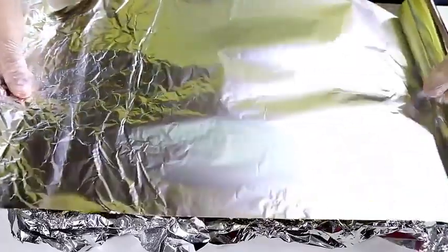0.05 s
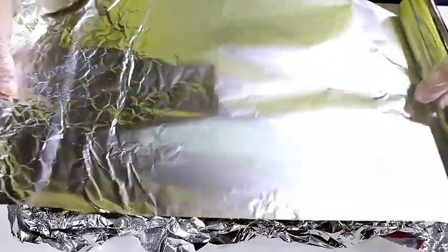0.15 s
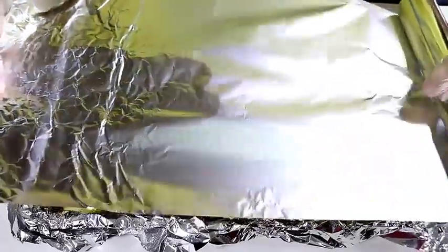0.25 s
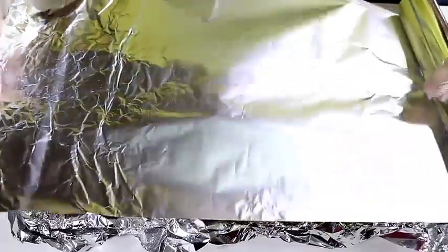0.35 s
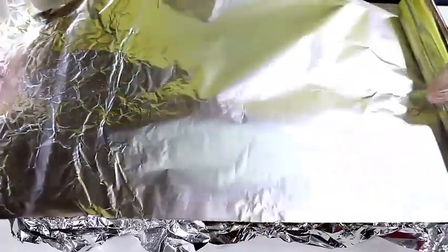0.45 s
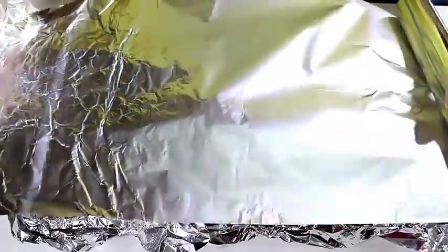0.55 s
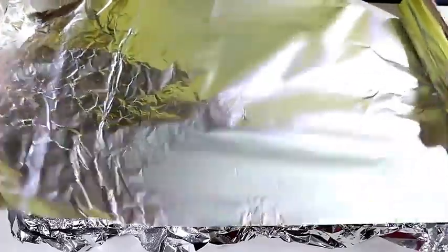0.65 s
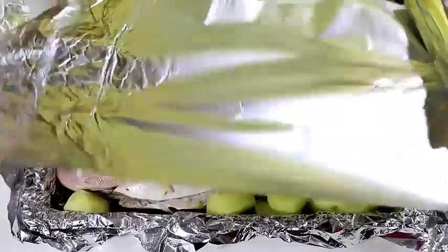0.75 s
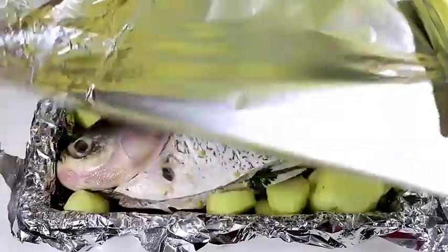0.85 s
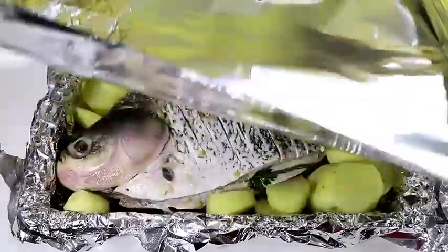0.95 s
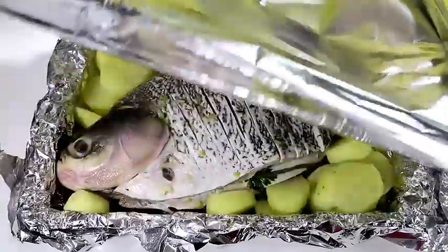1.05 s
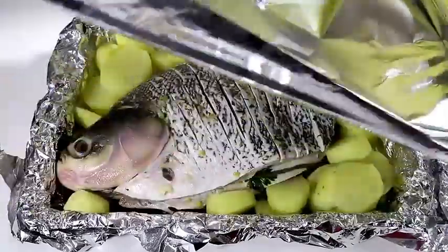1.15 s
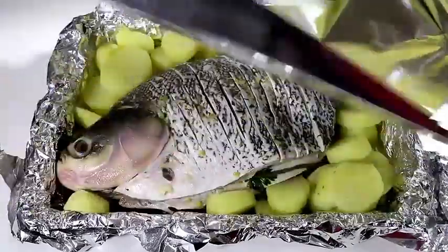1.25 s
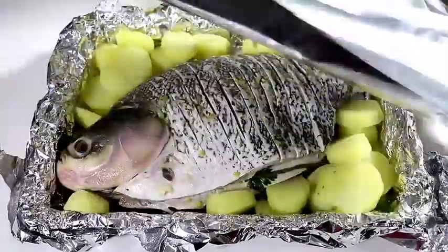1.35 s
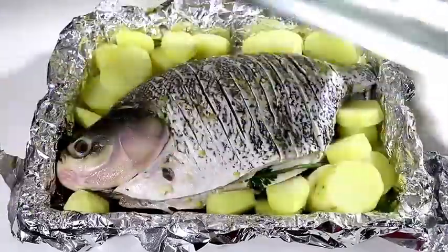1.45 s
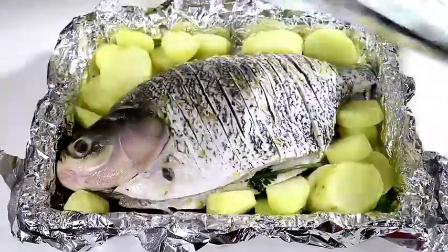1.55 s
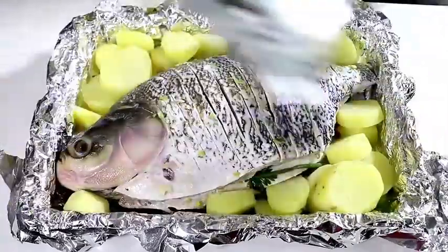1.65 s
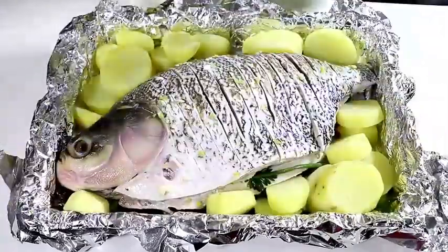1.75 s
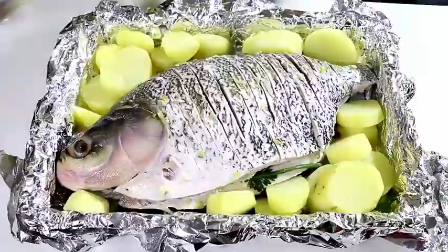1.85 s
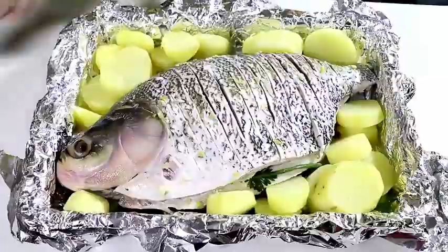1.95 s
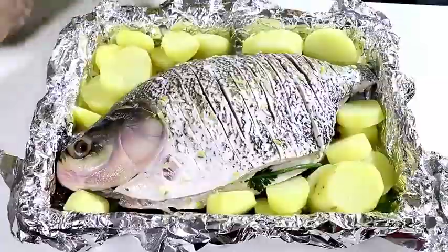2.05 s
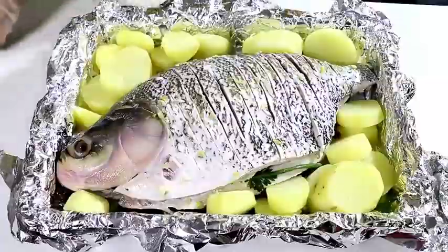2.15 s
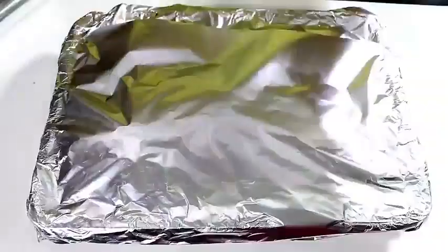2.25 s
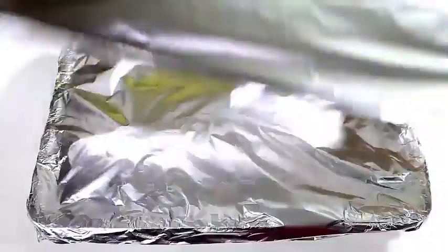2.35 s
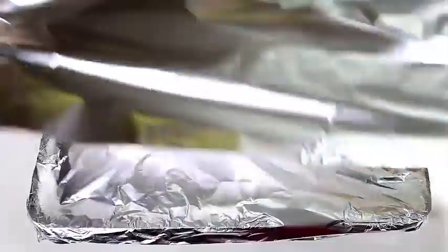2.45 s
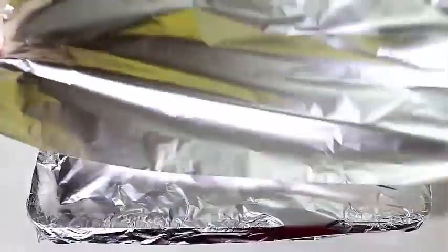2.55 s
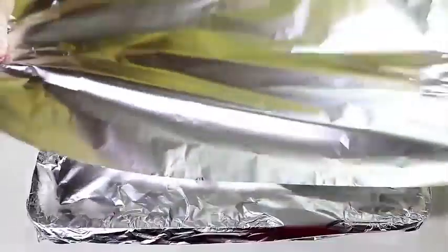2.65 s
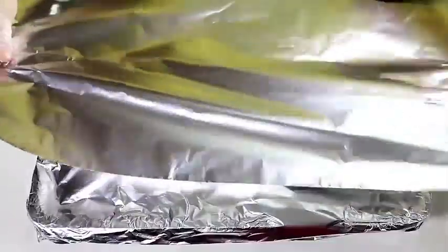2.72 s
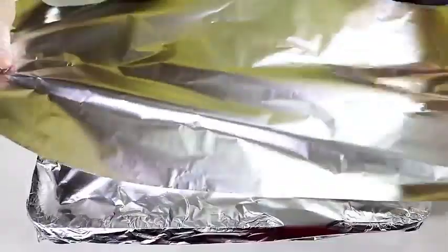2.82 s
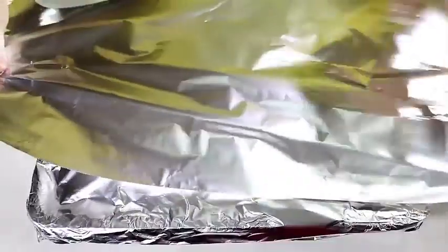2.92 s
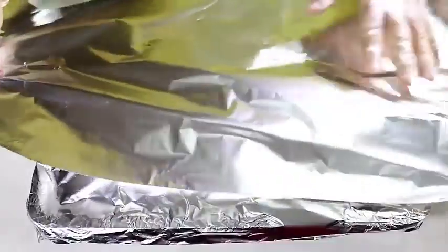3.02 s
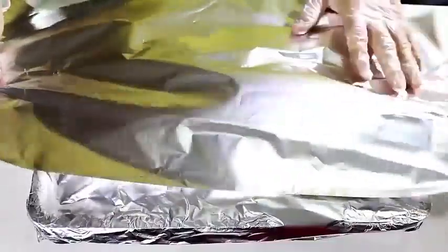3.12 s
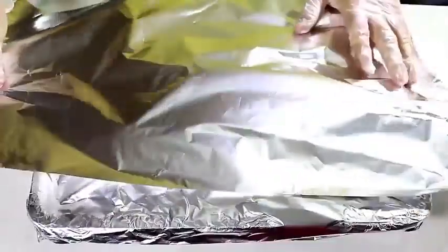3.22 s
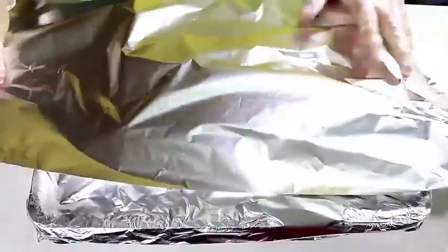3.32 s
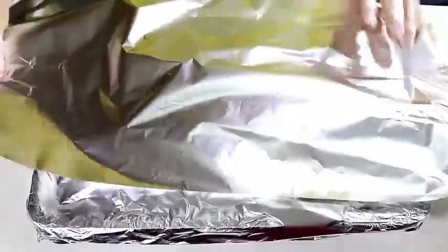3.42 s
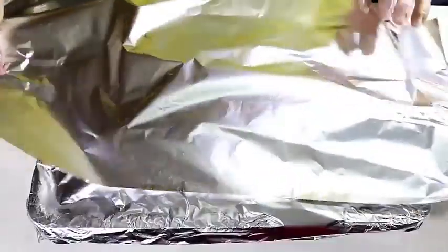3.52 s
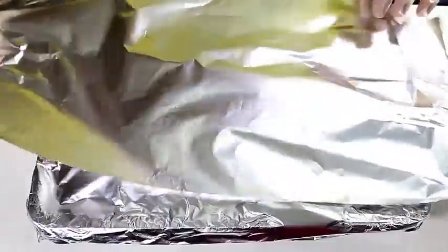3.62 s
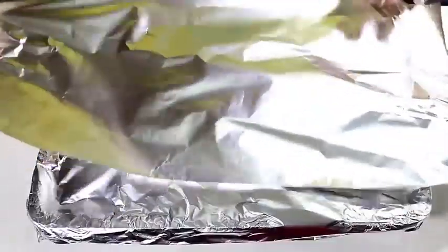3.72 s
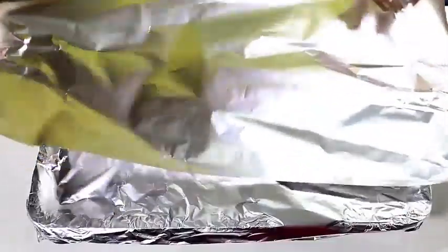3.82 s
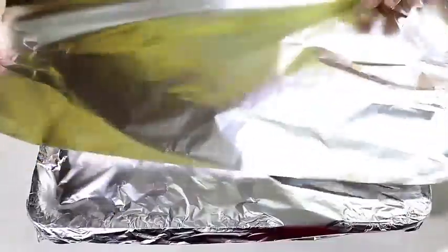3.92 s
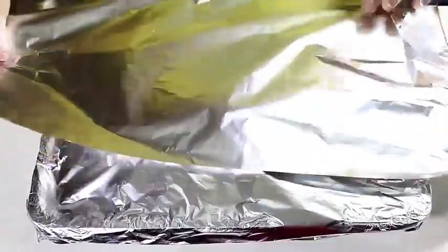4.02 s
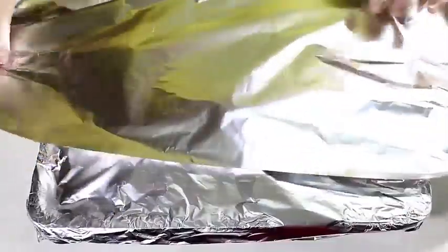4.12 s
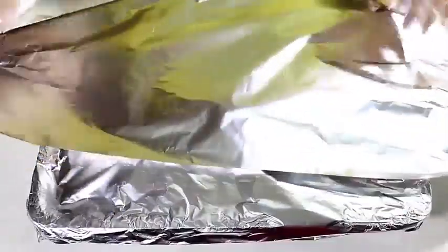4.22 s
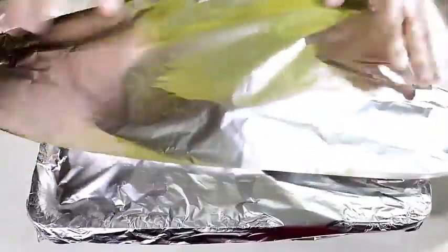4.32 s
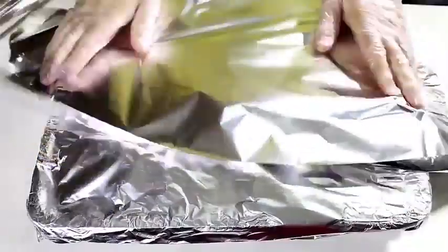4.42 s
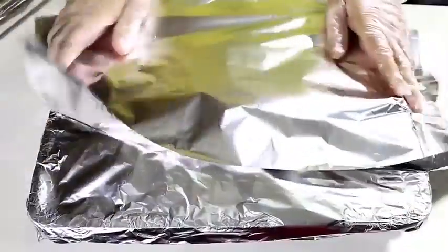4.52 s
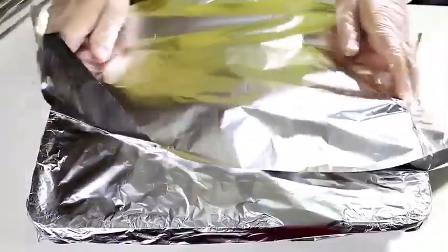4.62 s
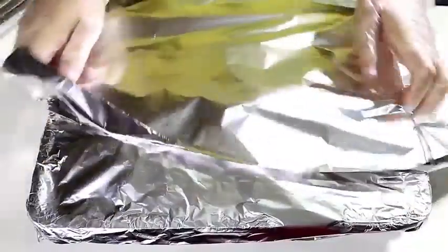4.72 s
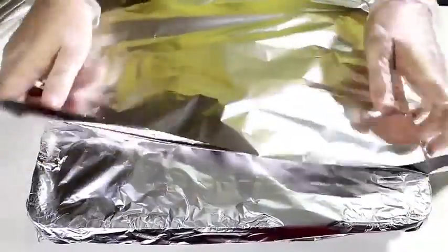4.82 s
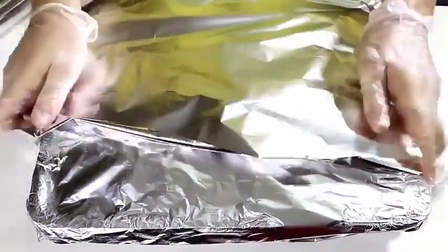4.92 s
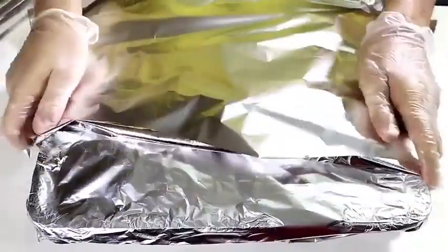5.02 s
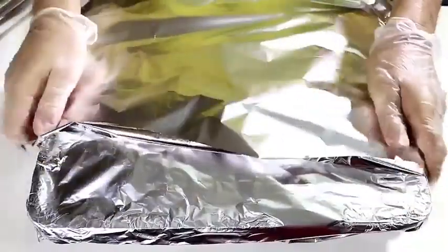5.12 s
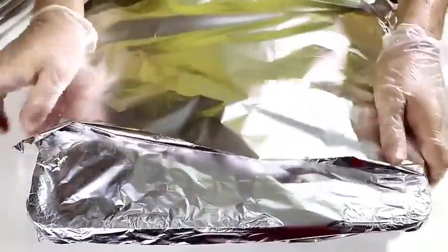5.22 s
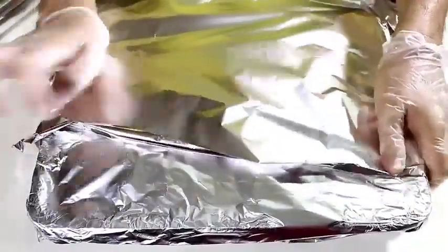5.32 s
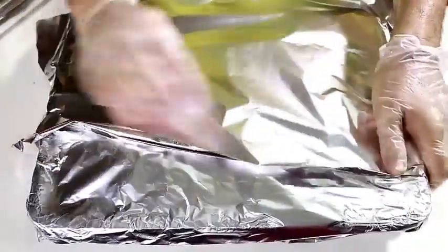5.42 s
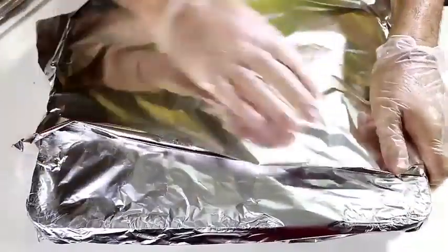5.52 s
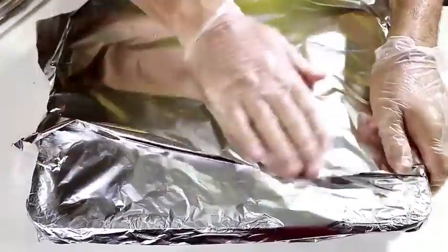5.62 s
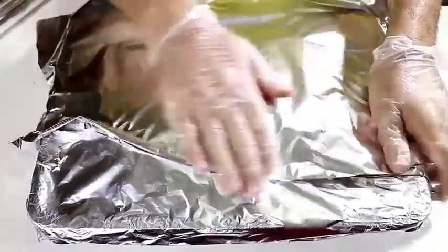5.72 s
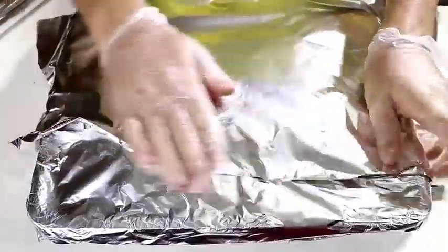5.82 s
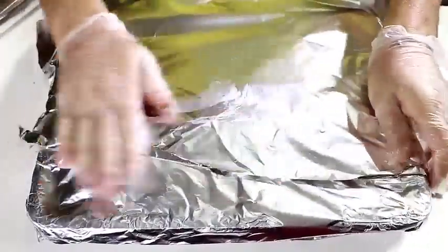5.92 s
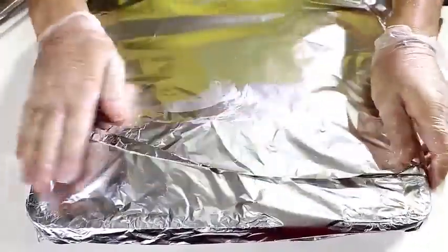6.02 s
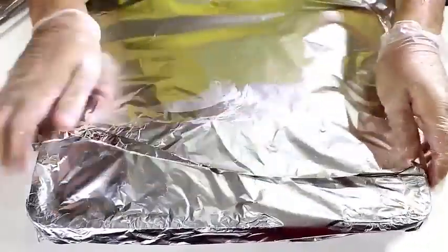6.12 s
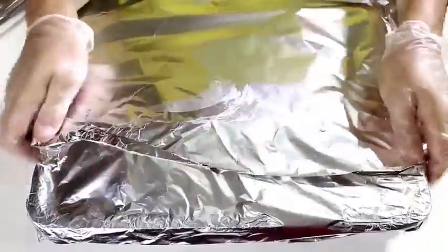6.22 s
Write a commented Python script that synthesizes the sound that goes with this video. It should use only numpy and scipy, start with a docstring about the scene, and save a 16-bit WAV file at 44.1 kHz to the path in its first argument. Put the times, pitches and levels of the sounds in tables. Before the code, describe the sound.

Close to the microphone in a home kitchen, a sheet of aluminium foil rustles quietly, then bursts loudest around one hard snap with a soft push of air. Softer crinkling and fine ticks follow as it is spread; a second burst brings crackles and hollow popping dents as hands press it over a pan. A very faint low murmur lies beneath.

```python
"""A sheet of aluminium foil is pulled, torn off, spread and pressed over a pan, close to one microphone.
It opens on quiet rustles, bursts loudest at 1.5 s around one hard snap, then settles into softer handling;
a second burst comes near 4.6 s, and most of the popping dents follow it, up to the end.
Countless buckles snap through the metal: the smaller the buckle, the higher and shorter its ring.
The sheet and the kitchen smear them into a short shimmer, over a low murmur that never stops."""
import sys
import numpy as np
from scipy import signal
from scipy.fft import rfft, irfft
from scipy.io import wavfile
from scipy.ndimage import uniform_filter1d

SR = 44100
rng = np.random.default_rng(int(sys.argv[2]) if len(sys.argv) > 2 else 0)


def inscribe(sig):
    """Save sig as 16-bit PCM at rate SR to the path in sys.argv[1].

    A 1-D sig is mono; a 2-D sig holds one channel per row.
    Samples are clipped to [-1, 1] before scaling.
    """
    pcm = np.round(np.clip(np.atleast_2d(sig).T, -1, 1) * 32767)
    wavfile.write(sys.argv[1], SR, pcm.astype(np.int16))


N = 276286  # length in samples


def gain_of(db):
    """Turns dB into an amplitude factor; doubled dB give a power factor."""
    return 10 ** (np.asarray(db) / 20)


def evened(x):
    """Scales a sound to an RMS of one."""
    return x / np.sqrt(np.mean(x ** 2) + 1e-20)


def read(points, hz):
    """Reads a curve of (Hz, value) points, with straight lines over log frequency."""
    point_hz, value = np.transpose(points)
    return np.interp(np.log(hz + 1), np.log(point_hz + 1), value)


def coloured(x, points):
    """Equalises a sound along a curve of (Hz, dB) points."""
    gains = gain_of(read(points, np.fft.rfftfreq(len(x), 1 / SR)))
    return irfft(rfft(x) * gains, len(x))


def add(mix, s, sound):
    """Lays a sound into the mix from s seconds on, cut at the end of the mix."""
    part = mix[round(s * SR):][:len(sound)]
    part += sound[:len(part)]


def ring(hz, cycles):
    """One buckle: a sine that swells within about half a cycle and dies after some cycles."""
    turns = np.arange(round(3 * cycles * SR / hz)) * hz / SR
    swell = 1 - np.exp(-2 * turns)
    return np.sin(2 * np.pi * turns) * swell * np.exp(-2 * turns / cycles)


def resonate(x, hz, width_hz):
    """A gliding resonance: shifts the curve hz down to zero, smooths, and shifts back."""
    turn = np.exp(2j * np.pi * np.cumsum(hz) / SR)
    r = np.exp(-np.pi * width_hz / SR)
    return 2 * (turn * signal.lfilter([1 - r], [1, -r], x / turn)).real


# Spectrum of the murmur. Each row: frequency in Hz, gain in dB.
MURMUR = [(18, -38), (30, -13), (102, 6.5), (204, -3), (400, -5), (520, -31), (880, -120)]


def murmur(level_db=-71.5):
    """The low murmur of the kitchen: steady noise, equalised towards the bass."""
    return gain_of(level_db) * evened(coloured(rng.standard_normal(N), MURMUR))


# How long the sheet and walls ring on. Each row: frequency in Hz, time to die by 60 dB in seconds.
RING_ON = [(200, 0.22), (1200, 0.14), (4000, 0.08), (14000, 0.1)]


def shimmer(x, turns_per_s=2.5, count=12):
    """The sheet and nearby walls ring on: noise tails, each band dying at its own speed.
    The sheet keeps moving, so the sound fades from tail to tail around a circle of them."""
    hz, t, z = signal.stft(rng.standard_normal((count, SR // 3)), SR, nperseg=128)
    decay = gain_of(-60 * t / read(RING_ON, hz)[:, None])
    tails = signal.istft(z * decay, SR, nperseg=128)[1]
    place = np.arange(N) / SR * turns_per_s * count
    out = np.zeros(N)
    for k, tail in enumerate(tails):
        distance = abs((place - k + count / 2) % count - count / 2)
        window = np.cos(np.pi / 2 * np.minimum(distance, 1))
        out += signal.oaconvolve(x * window, tail / np.linalg.norm(tail))[:N]
    return out


# Air pushed out from under the sheet. Each row: start in seconds, level in dB, length scale in seconds.
AIR_PUFFS = [(1.509, -38, 0.0035), (1.528, -27, 0.0066), (1.549, -41, 0.0062), (4.648, -61, 0.0055),
             (5.027, -46, 0.0059), (5.155, -31.5, 0.0019), (5.178, -52, 0.0065), (6.15, -44, 0.0065)]


def puffs():
    """Each puff is one soft push of air and a weaker swing back."""
    out = np.zeros(N)
    for s, db, length_s in AIR_PUFFS:
        u = np.arange(0, 8, 3 / (length_s * SR))
        add(out, s, gain_of(db) * 3 * u * (1 - u / 2) * np.exp(-u))
    return out


# Hand-sized dents that pop over. Each row: start in seconds, level in dB, pitch in Hz.
POPPING_DENTS = [(3.044, -38, 261), (4.649, -24, 694), (4.799, -45, 430), (5.071, -28, 834),
                 (5.155, -26.5, 530), (5.187, -23, 969), (5.199, -26, 714), (5.929, -28, 680),
                 (6.024, -32, 410), (6.112, -35, 534), (6.151, -23, 778), (6.166, -26.5, 443)]


def dents():
    """A dent is a large buckle: it pops over with a few low cycles."""
    out = np.zeros(N)
    for s, db, hz in POPPING_DENTS:
        add(out, s, gain_of(db) * ring(hz, cycles=2.4))
    return out


# Lone sharp ticks. Each row: start in seconds, level in dB before the common lift.
LONE_TICKS = [(0.9514, -18), (0.97, -27), (1.008, -25), (1.6194, -23), (3.3684, -23), (3.8112, -24),
              (3.923, -19), (4.068, -12), (4.189, -23), (4.6834, -22), (4.7744, -25), (5.0193, -14),
              (5.8147, -23), (5.85, -17)]


def lone_ticks(lift_db=4):
    """Each tick is a single tiny buckle, pitched at random from 5 to 11 kHz."""
    out = np.zeros(N)
    for (s, db), pitch in zip(LONE_TICKS, rng.random(len(LONE_TICKS))):
        add(out, s, gain_of(db + lift_db) * ring(5000 + 6000 * pitch, cycles=1.2))
    return out


# Sharp folds that set off a small avalanche.
# Each row: start in seconds, level in dB before the trims of avalanche and facet.
FOLDS = [(0.816, -28), (1.495, -17), (1.502, -2), (2.377, -15.5), (3.922, -17), (4.043, -24), (4.584, -19),
         (4.6252, -11.5), (4.646, -5.5), (5.1835, -12), (5.5752, -13.5), (5.66, -16), (5.7976, -25),
         (5.814, -11.5)]


def snaps(avalanche_db=-15, avalanche_s=0.011, facet_db=-17):
    """A fold rings the facet beside it and sets off a dying spray of small ticks."""
    out, t = np.zeros(N), np.arange(3000) / SR
    shape = (len(FOLDS), len(t))
    spray = rng.standard_normal(shape) * rng.uniform(0.36, 2.6, shape)
    spray = signal.lfilter([1, -.6], [1], spray)  # tilts towards the treble
    spray = spray * .5 * np.exp(-t / avalanche_s) * (1 - np.exp(-t / 0.0011))
    for (s, db), pitch, ticks in zip(FOLDS, rng.random(len(FOLDS)), spray):
        add(out, s, gain_of(db + facet_db) * ring(900 + 1300 * pitch, cycles=3.1))
        add(out, s, gain_of(db + avalanche_db) * ticks)
    return out


# How strongly the foil sounds at each pitch. Each row: frequency in Hz, gain in dB.
FOIL_COLOUR = [(40, -14), (120, -15.5), (300, -4), (700, 0.3), (1200, -0.5), (2200, 4.5), (3200, -1.5),
               (4500, -0.5), (7000, 0.5), (8100, 3), (10000, 2), (13500, 0.4), (15500, 1)]


def buckles(lo_hz, hi_hz, per_s, cycles, spread_db, count=24):
    """Random clicks, a few of them large, each ringing a patch of its own size."""
    size = gain_of(spread_db * np.minimum(rng.exponential(1, N), 5))
    size = size * (rng.random(N) < per_s / SR) * rng.choice([-1., 1.], N)
    patch, out = rng.integers(0, count, N), np.zeros(N)
    for k, hz in enumerate(np.geomspace(lo_hz, hi_hz, count)):
        shape = ring(hz, cycles)
        weight = gain_of(read(FOIL_COLOUR, hz)) * np.sqrt(hz) / np.linalg.norm(shape)
        out += weight * signal.oaconvolve(size * (patch == k), shape)[:N]
    return evened(out)


# Each tug, shake or press of the hands. Each row: time of full strength in seconds, creases in dB,
# rise in seconds, hold in seconds, fade in seconds, facets in dB against the creases.
# Rise and fade are the times to cross 20 dB; the levels are before the trims in rustle().
HAND_MOVES = [(0.0, -36, .05, 0.027, .12, -10.5), (0.078, -40.5, .08, 0.023, 0.29, -4),
              (0.407, -36, 0.24, .02, 0.25, -7.5), (0.578, -38.5, .1, 0.057, 0.12, -16),
              (0.761, -42, 0.066, 0.017, .12, -9), (0.816, -39, .01, .015, .13, -10),
              (0.92, -33.5, 0.094, 0.066, 0.31, -11), (1.102, -40.5, 0.13, 0.034, 0.091, -6),
              (1.245, -31.5, .18, 0.038, 0.13, -10.5), (1.394, -36, 0.03, .005, 0.1, -7),
              (1.463, -39.5, .06, .01, .05, -21), (1.501, -19, 0.017, 0.041, 0.08, -6.5),
              (1.604, -30.5, 0.13, 0.046, .1, -13), (1.691, -32, .06, 0.0094, 0.095, -13.5),
              (1.797, -43.5, .1, 0.1, 0.24, -11.5), (1.998, -45, .08, 0.054, .4, -14),
              (2.377, -39.5, 0.0035, 0.027, 0.52, -9.5), (2.527, -37, .04, .01, .06, -13),
              (2.573, -35, .08, .01, 0.12, -16), (2.707, -40, .2, .13, 0.1, -10),
              (2.972, -39, 0.14, 0.041, 0.2, -9.5), (3.134, -43.5, 0.14, 0.024, 0.19, -7.5),
              (3.322, -35.5, 0.061, 0.026, 0.48, -8.5), (3.506, -36.5, .04, .08, 0.072, -10),
              (3.65, -42.5, .2, 0.18, .1, -8.5), (3.859, -33, 0.079, .11, 0.11, -11),
              (4.061, -33, 0.062, .17, 0.24, -11), (4.35, -38.5, .08, .02, 0.12, -8),
              (4.467, -41.5, 0.043, .008, 0.059, -7.5), (4.586, -40, .015, .03, .05, -7),
              (4.642, -27, 0.043, 0.0087, .13, -7.5), (4.756, -34, 0.13, .03, 0.21, -5.5),
              (4.944, -38.5, 0.048, .03, .1, -8), (5.027, -34, 0.1, 0.044, 0.18, -6.5),
              (5.19, -36, 0.12, .005, .17, -5), (5.33, -44.5, .1, 0.083, 0.091, -2.5),
              (5.49, -38, 0.13, .02, .14, -8), (5.591, -37, .12, .03, 0.049, -11),
              (5.659, -40.5, 0.024, 0.0044, 0.089, -8.5), (5.812, -36, 0.033, 0.027, .15, -9),
              (5.91, -38.5, .1, .03, .2, -7.5), (6.019, -37.5, .04, .02, 0.14, -6.5),
              (6.11, -38.5, 0.22, 0.052, 0.44, -3.5)]
STILL_DB = -64  # the sheet settling between moves
BEND = 1.087  # rises and fades steepen away from full strength


def handling(t, lag=1, facets=False):
    """Power sum of all moves in dB: each rises, holds and fades, the fade stretched by lag."""
    power = gain_of(2 * STILL_DB) * np.ones(len(t))
    for s, creases_db, rise, hold, fade, facets_db in HAND_MOVES:
        before = (s - t) / rise
        after = (t - s - hold) / (fade * lag)
        away = np.maximum(np.maximum(before, after), 0)
        power = power + gain_of(2 * (creases_db + facets * facets_db - 20 * away ** BEND))
    return 10 * np.log10(power)


# The four sizes of buckle: creases, pinpricks, facets, panels.
# Each row: lowest pitch in Hz, highest pitch in Hz, buckles a second, ring in cycles, size spread in dB.
BUCKLE_SIZES = [(2855, 9040, 12000, 3.2, 0.5), (8930, 16270, 14000, 4.6, 0.5), (836, 4140, 4000, 4.1, 2),
                (126, 857, 900, 2.13, 2)]
# How the sheet lies, held taut or resting on the pan. Each row: time in seconds,
# pinpricks in dB against the creases (before the gain from harder work), panels in dB against the facets,
# boom of the air gap in Hz, boom in dB against the facets.
SHEET_LIE = [(0, 2.5, -10, 1070, -3), (.35, 0.5, -14, 1230, -2.5), (.9, 2.5, -12, 1240, -4),
             (1.4, 0.5, -13.5, 1330, -15), (1.55, -1, -6.5, 1440, -9), (1.8, 1.5, -15.5, 1690, -37),
             (2.25, 0.5, -10, 1600, -32), (2.8, 2, -17.5, 1380, -23), (3.35, 4.5, -12, 1260, -9),
             (3.7, 1, -11.5, 1240, -9), (4.0, 1.5, -19.5, 1200, -11.5), (4.5, .5, -17.5, 1250, -15),
             (4.75, 2, -8, 1300, -8.5), (5.3, 2.5, -6, 1350, -10), (5.6, 4.5, -9, 1340, -11.5),
             (6.26, 3, -7, 1400, -10)]
FACETS_LAG = 1.206  # the larger facets take this many times as long to fade
FINER = 0.23  # dB of pinpricks gained for each dB of harder work


def rustle(clump_db=0.69):
    """Buckles of all sizes follow the hands and come in shared clumps of a few milliseconds."""
    t = np.arange(N) / SR
    ms = np.arange(0, N / SR, 1 / 1000)  # the moves are worked out once a millisecond
    effort_db = np.interp(t, ms, handling(ms))
    facets_db = np.interp(t, ms, handling(ms, FACETS_LAG, facets=True))
    s, *lie = np.transpose(SHEET_LIE)
    pinpricks_db, panels_db, gap_hz, gap_db = (np.interp(t, s, column) for column in lie)
    creases, pinpricks, facets, panels = (buckles(*size) for size in BUCKLE_SIZES)

    boom = resonate(resonate(facets, gap_hz, width_hz=810), gap_hz, width_hz=970)
    dull = facets + gain_of(gap_db) * evened(boom) + gain_of(panels_db) * panels
    crackle = gain_of(-15.5) * buckles(3800, 12000, 250, 0.66, 2.3)  # sparse, very short ticks
    finer_db = pinpricks_db + FINER * (effort_db + 39)
    bright = creases + crackle + gain_of(finer_db) * pinpricks

    clumps_db = clump_db * evened(uniform_filter1d(rng.standard_normal(N), 350))
    return gain_of(clumps_db) * (gain_of(effort_db - 4.5) * bright + gain_of(facets_db) * dull)


def expanded(x):
    """An expanding transfer curve that stresses peaks: samples well above the running level grow,
    the others shrink."""
    level = np.sqrt(abs(uniform_filter1d(x ** 2, 600)) + 1e-14)
    return .93 * x * (abs(x) / level) ** .3


def scene():
    """Foil and its shimmer are expanded together, the murmur lies beneath; both channels are alike."""
    foil = rustle() + snaps() + lone_ticks() + dents() + puffs()
    mono = expanded(foil + gain_of(-6.5) * shimmer(foil)) + murmur()
    return np.array([mono, mono])


# Colour of the microphone. Each row: frequency in Hz, gain in dB.
MICROPHONE_COLOUR = [(20, -11), (45, -4), (4000, -1.83), (4700, -1), (5500, 1.2), (7500, 1.27),
                     (8100, -2.5), (8800, -0.9), (11000, -2), (13500, 2), (14900, -1), (15500, -1.5)]
EDGE_HZ = 15780  # upper band limit


def record(dry):
    """Microphone colour, then a steep low-pass as the band limit."""
    heard = np.array([coloured(channel, MICROPHONE_COLOUR) for channel in dry])
    low_pass = signal.firwin(801, EDGE_HZ, window=("kaiser", 9), fs=SR)
    return signal.oaconvolve(heard, low_pass[None], "same")


dry = scene()
out = record(dry)
inscribe(out)
```